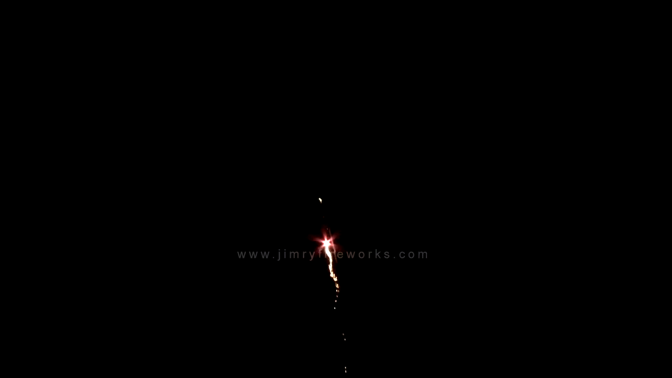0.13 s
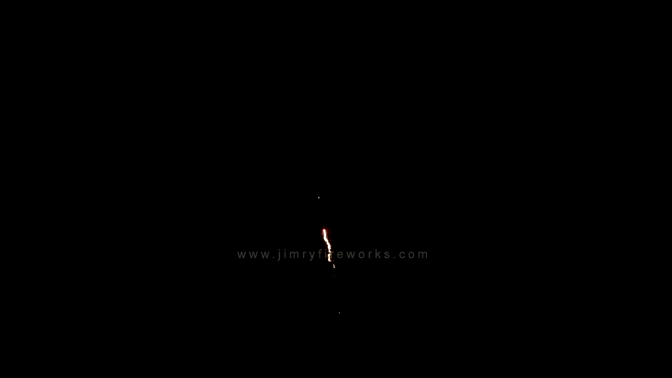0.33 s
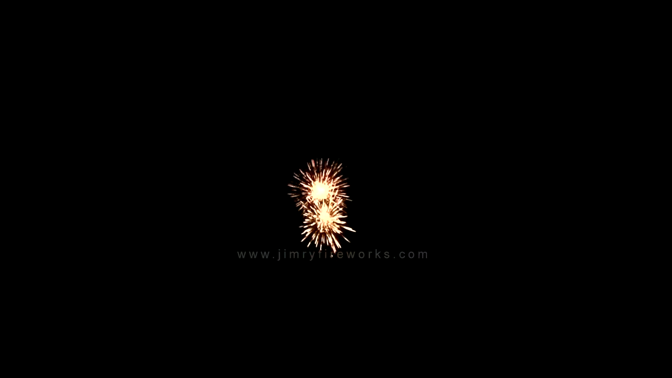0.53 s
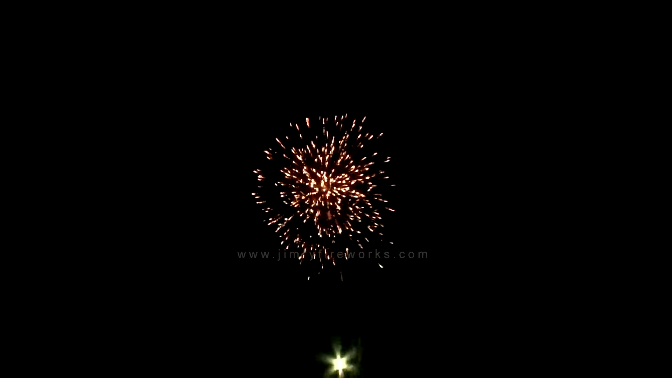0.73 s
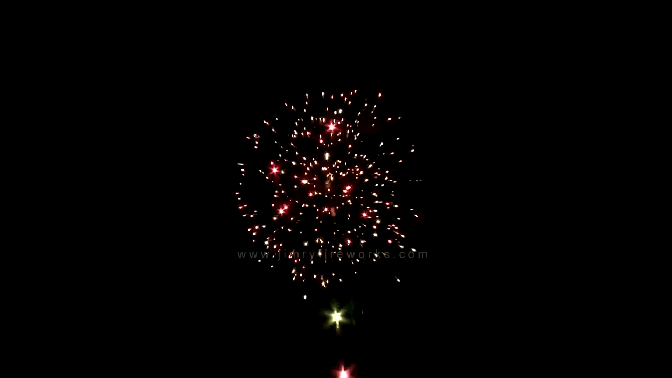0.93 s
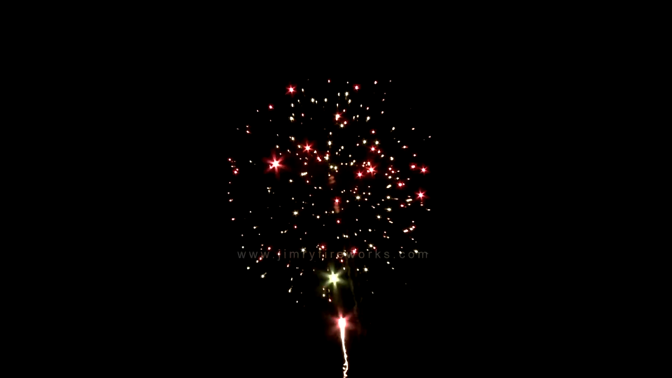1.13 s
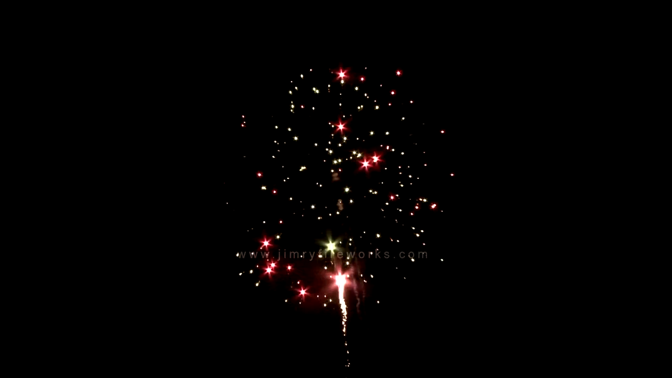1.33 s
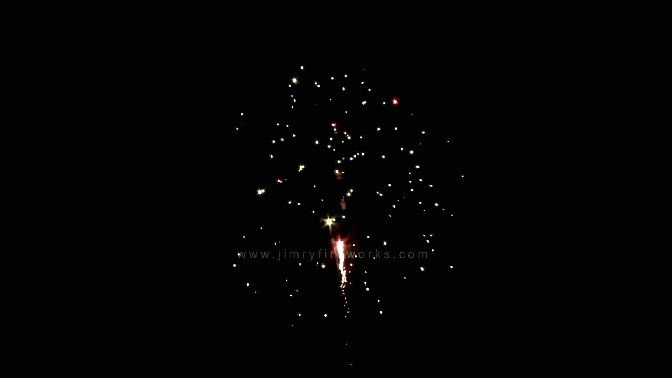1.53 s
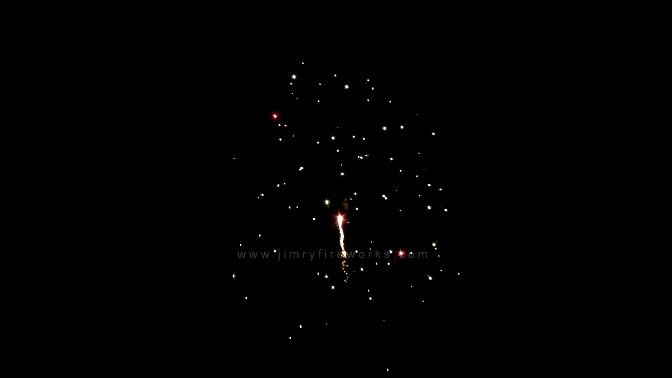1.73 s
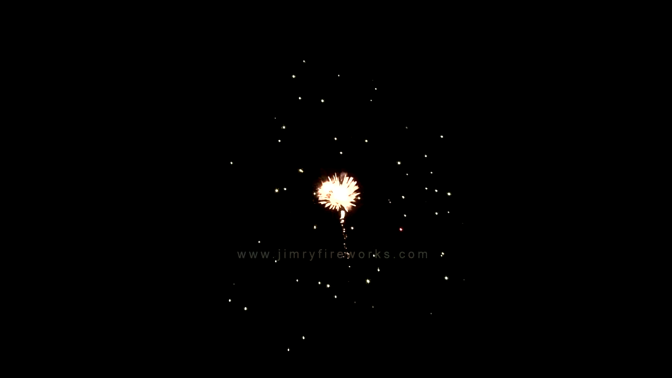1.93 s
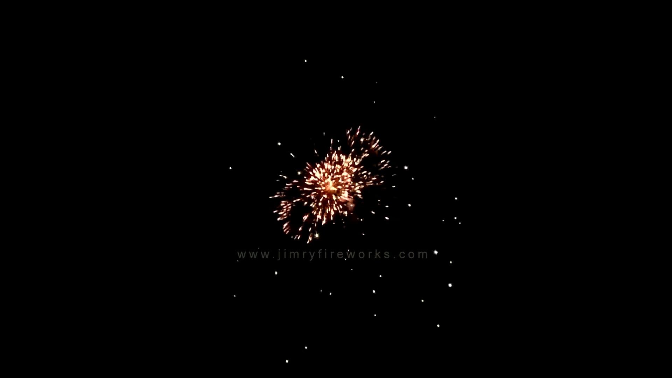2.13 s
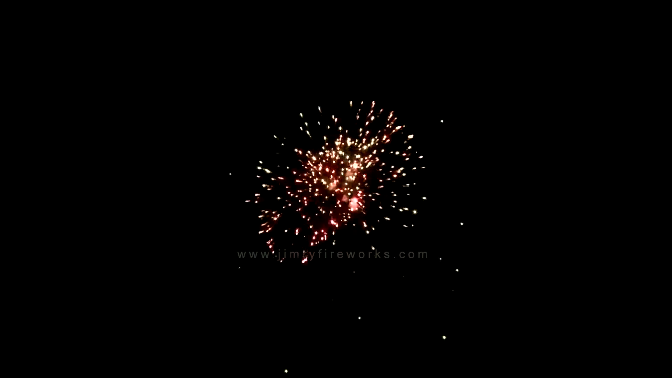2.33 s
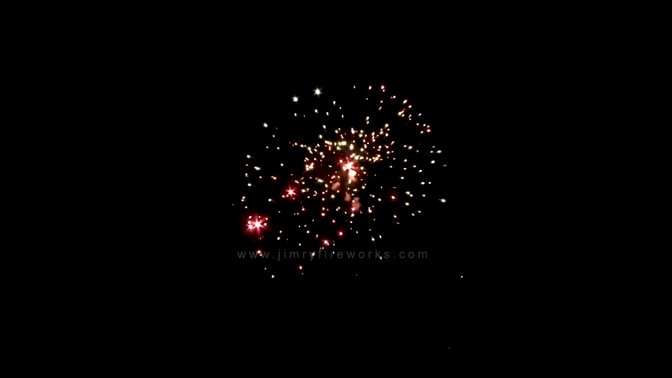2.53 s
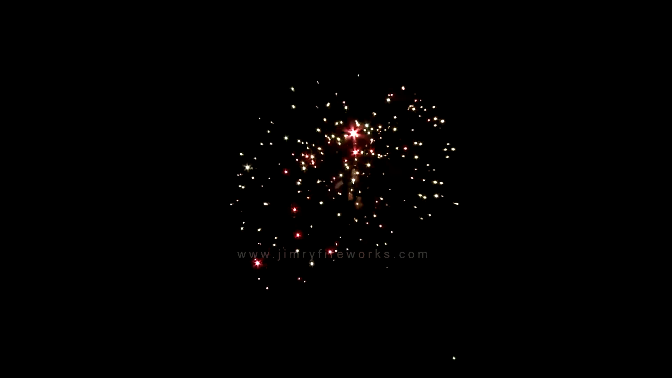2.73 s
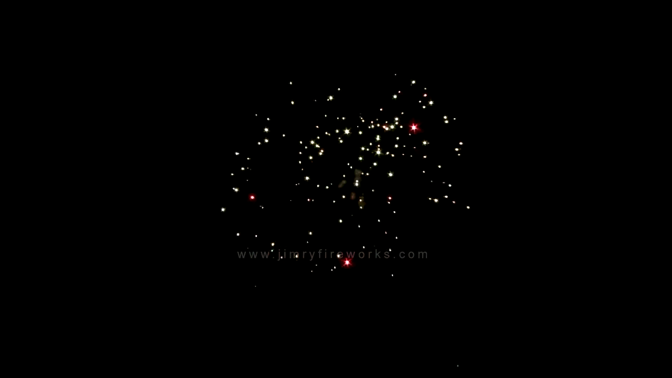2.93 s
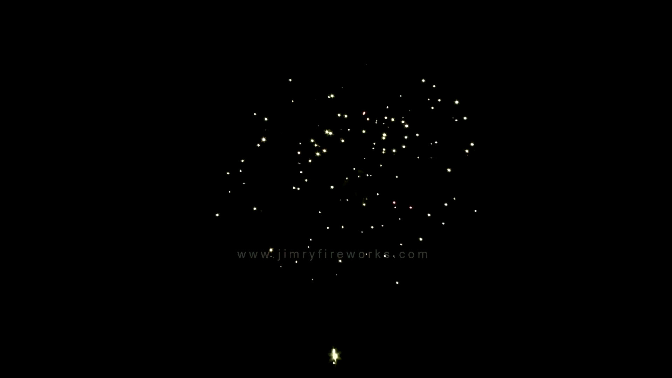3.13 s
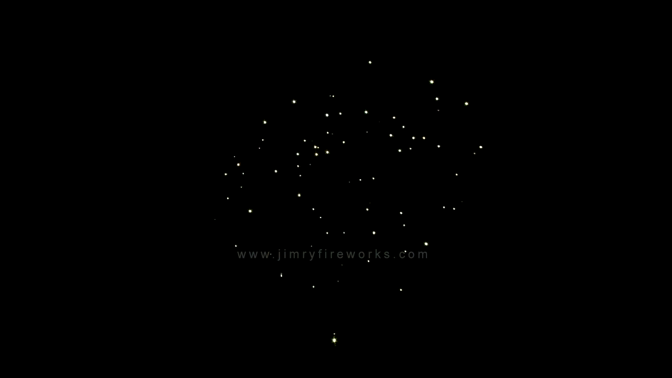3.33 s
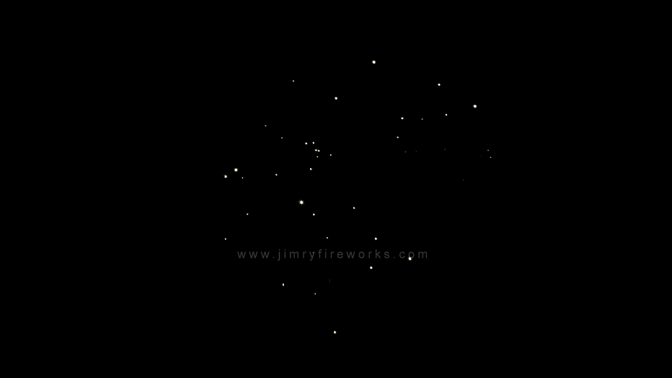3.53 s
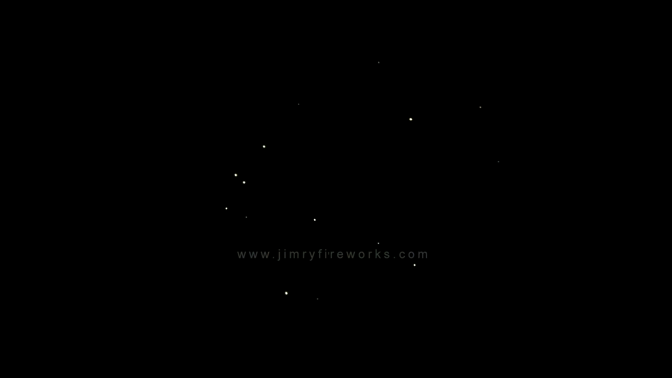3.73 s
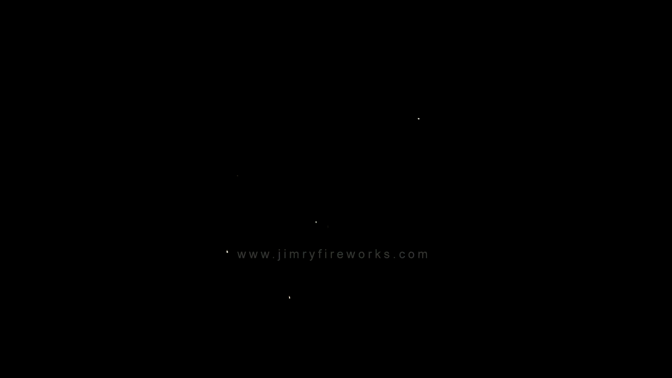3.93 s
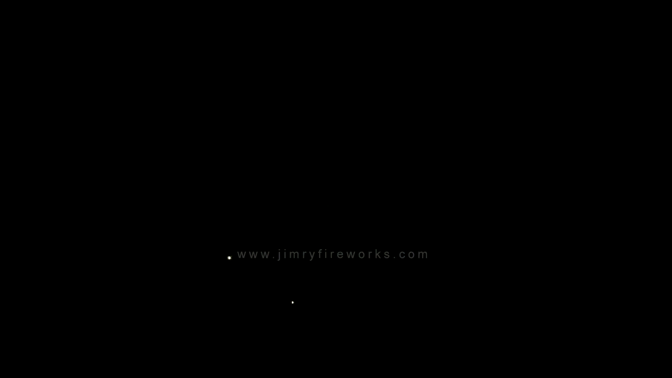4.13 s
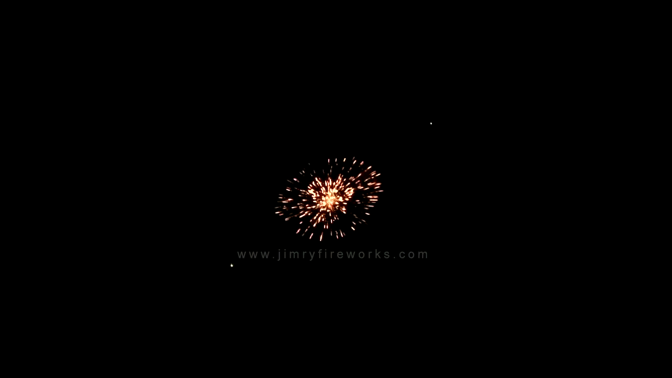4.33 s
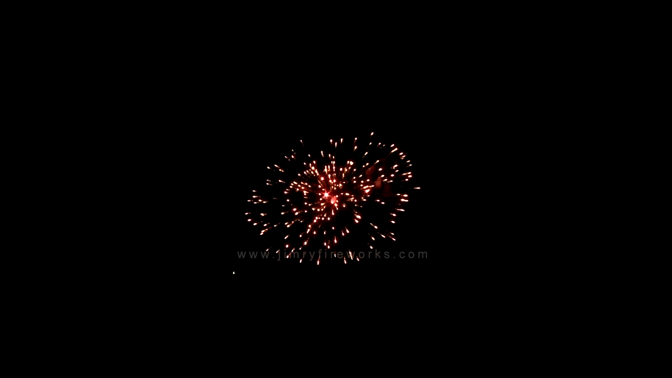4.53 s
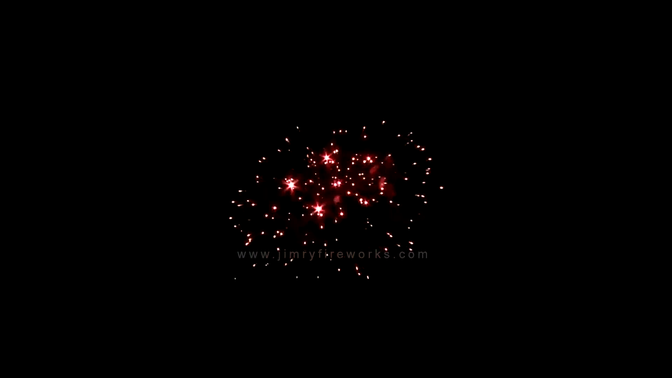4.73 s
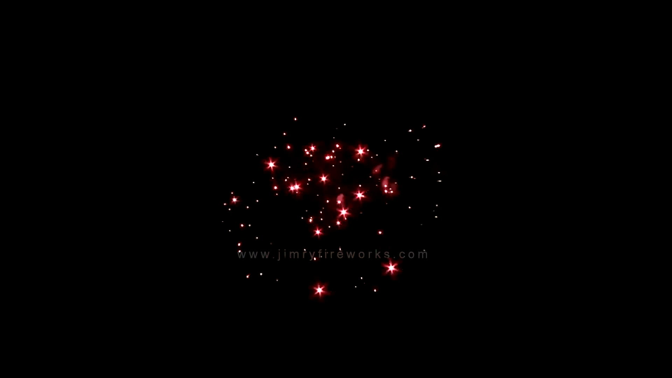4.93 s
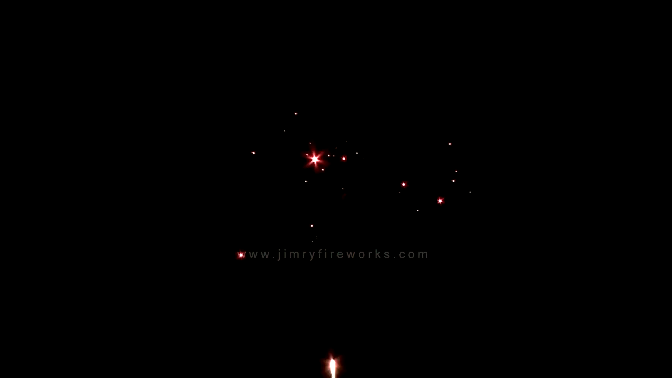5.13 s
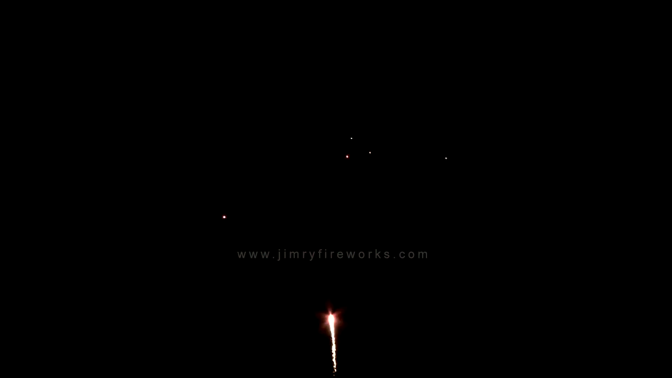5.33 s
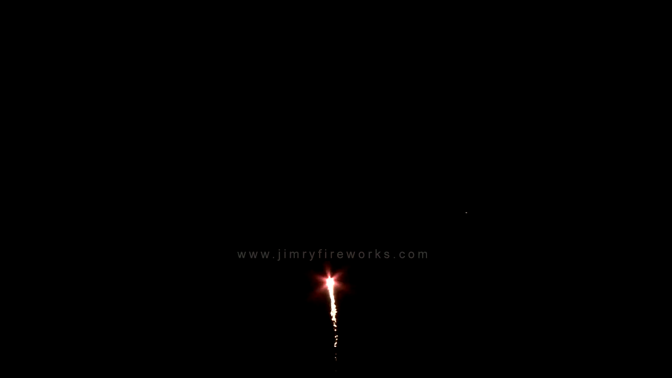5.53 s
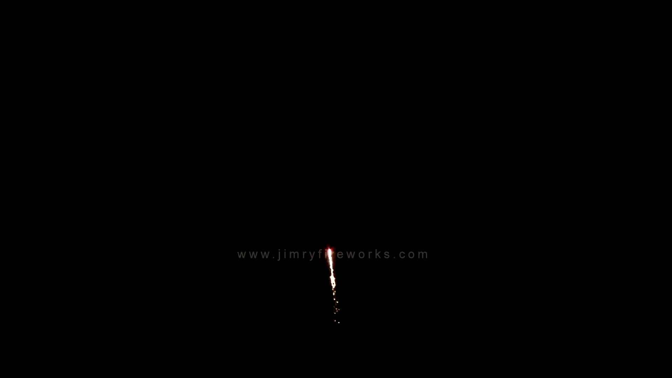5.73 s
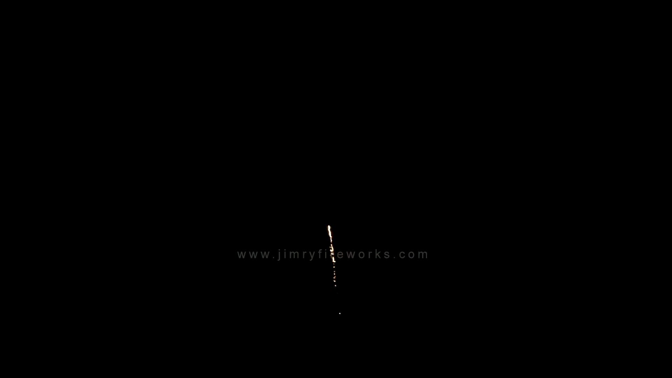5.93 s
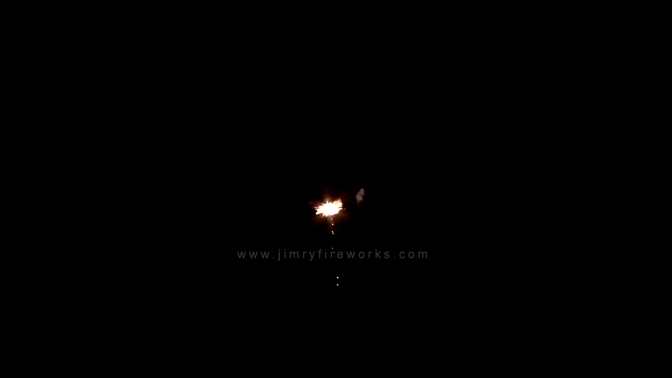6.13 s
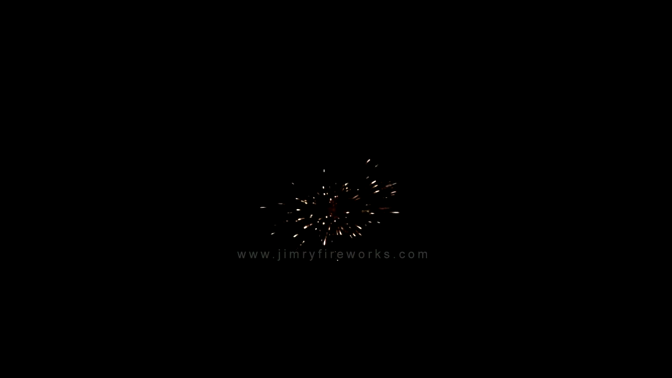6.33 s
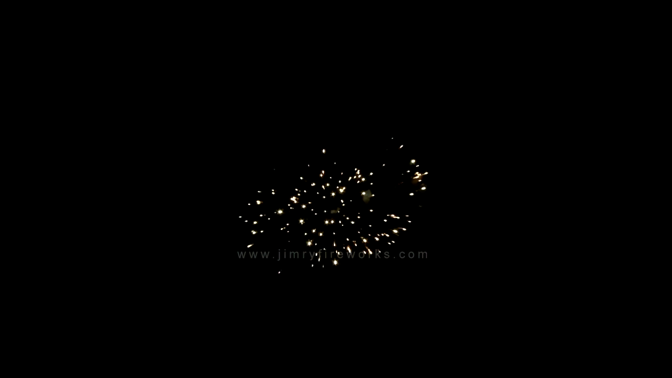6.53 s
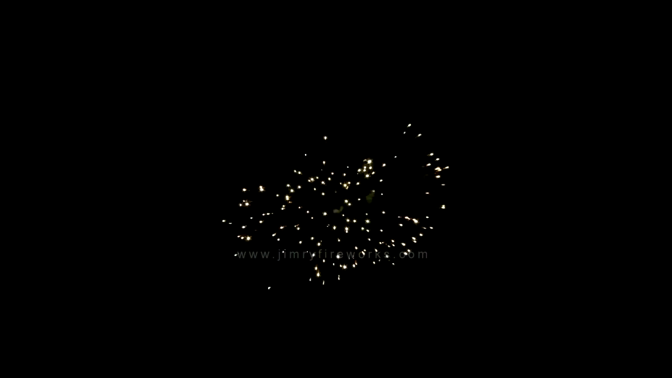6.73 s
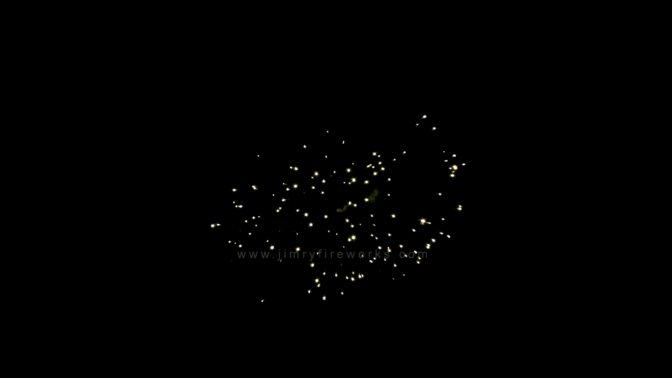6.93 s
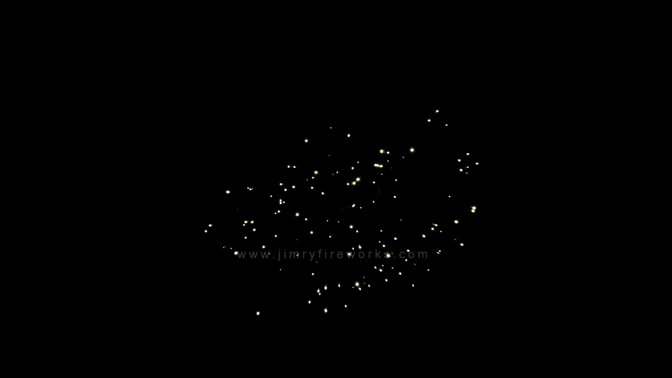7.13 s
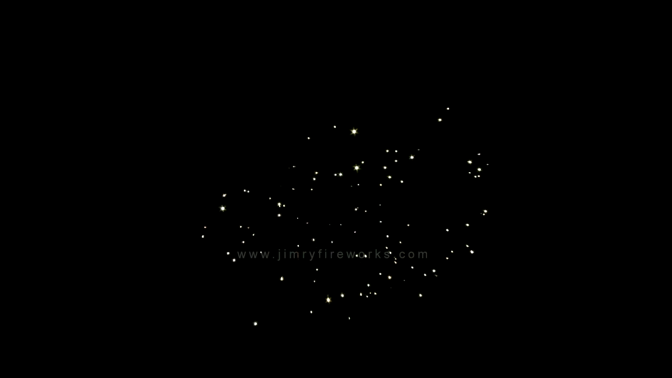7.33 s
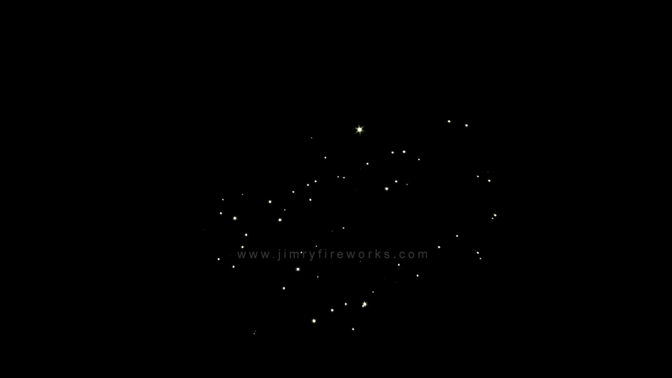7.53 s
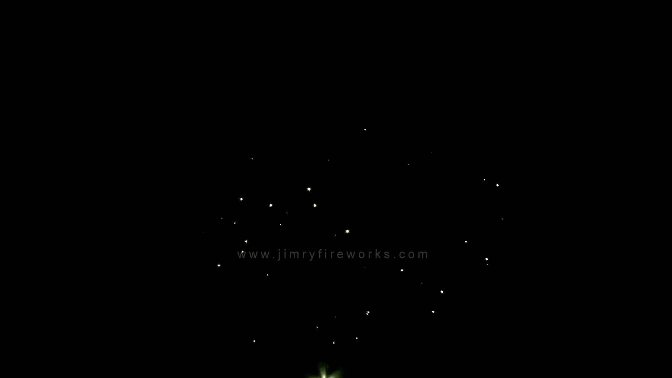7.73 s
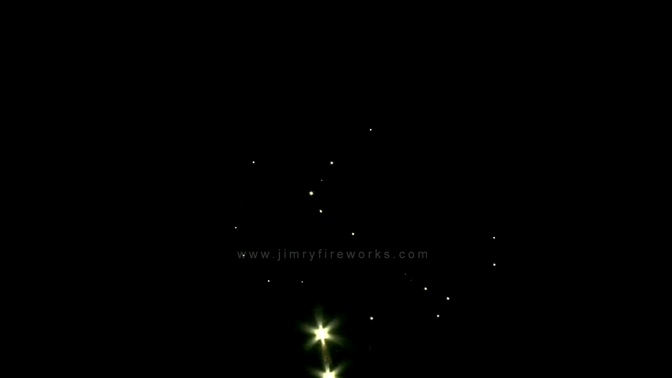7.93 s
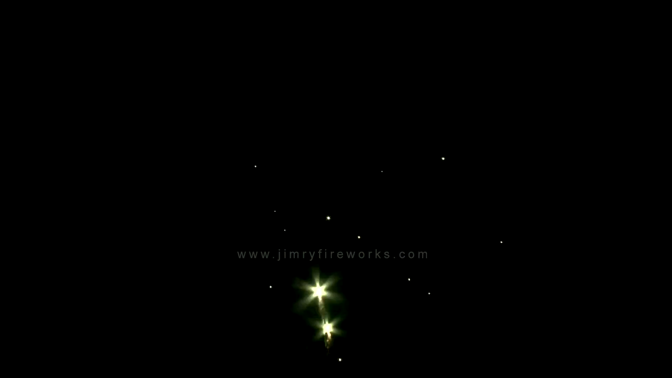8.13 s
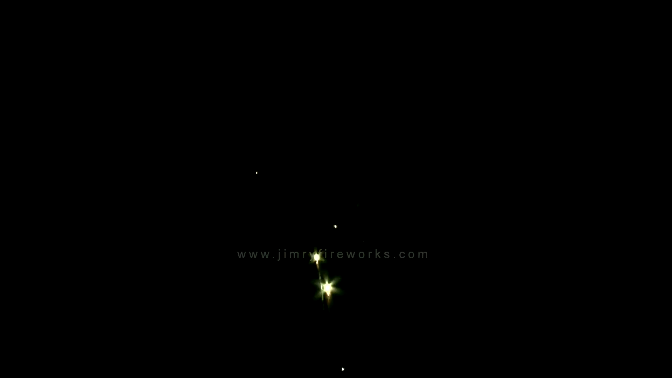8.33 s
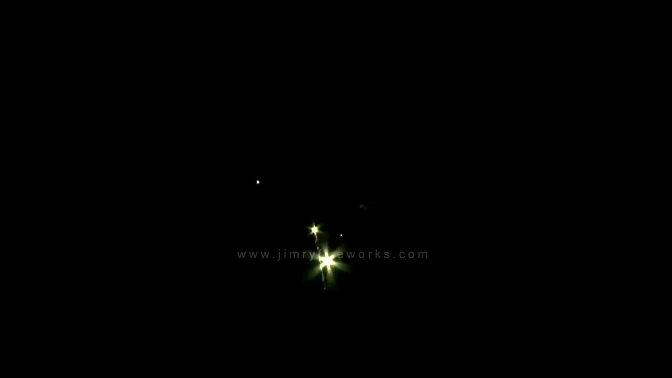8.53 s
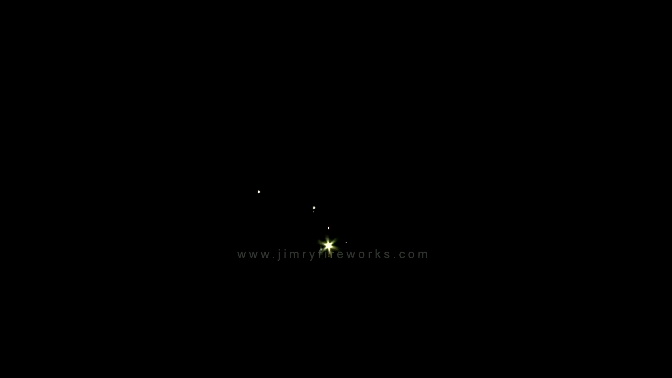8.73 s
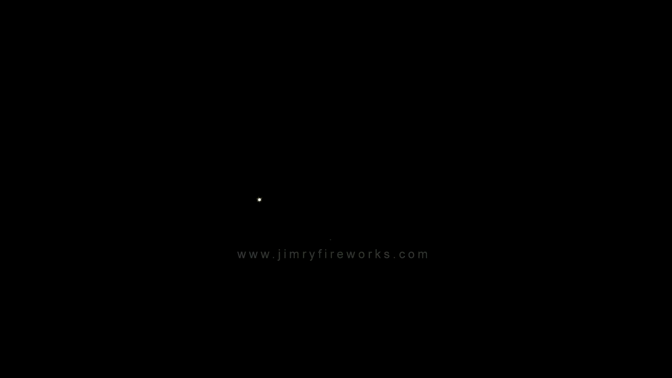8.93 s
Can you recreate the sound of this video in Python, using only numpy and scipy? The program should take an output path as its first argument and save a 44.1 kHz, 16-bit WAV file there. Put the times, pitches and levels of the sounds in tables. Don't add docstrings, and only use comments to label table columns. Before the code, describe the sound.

Clipped firework booms and dry launch cracks slap off nearby walls, then roll back duller from distant slopes, with faint hissing comets and an idling engine.

```python
import sys
import numpy as np
from scipy import signal
from scipy.fft import rfft, irfft, next_fast_len
from scipy.io import wavfile
from scipy.ndimage import uniform_filter1d, map_coordinates

SR = 44100
rng = np.random.default_rng(int(sys.argv[2]) if len(sys.argv) > 2 else 0)


def invert_db(level):
    return 10 ** (np.asarray(level, dtype=float) / 20)


def unload_audio(sound):
    columns = np.transpose(np.atleast_2d(sound))
    steps = np.round(np.clip(columns, -1, 1) * 32767)
    wavfile.write(sys.argv[1], SR, steps.astype(np.int16))


N = 395577

# freq_hz, density_db_per_hz
RUMBLE_SPECTRUM = [(10, -60), (27, -31), (40, -10), (65, 0), (95, -3), (140, -14), (250, -30), (1000, -120)]
AIR_SPECTRUM = [(60, -40), (100, -14), (200, -12), (400, 0), (850, -8), (1030, -7), (2300, -19),
                (4100, -24), (6150, -41), (9000, -70), (15500, -110)]
COMET_SPECTRUM = [(100, -90), (300, -30), (800, -5), (2500, 0), (4200, -5), (5500, -14), (7500, -21),
                  (11000, -50), (16000, -100)]
RUMBLE_DB, RUMBLE_FALL_DB_PER_S, MURMUR_DB = -36, 2.5, -43.5

# order, level_db
ENGINE_ORDERS = [(1, -43), (2, -39), (3, -25), (4, -11), (5, -6), (6, 0), (7, -3), (8, -2), (9, -17),
                 (10, -14), (11, -15), (12, -15)]
# time_s, level_db
ENGINE_LEVEL = [(0, -42), (3, -45), (4.4, -43.5), (5.5, -46.5), (6.4, -50), (7.4, -48), (8.3, -42),
                (8.97, -44)]
IDLE_HZ, REV_HZ_PER_S2 = 11.2, .012

# start_s, burn_s, level_db, release_db_per_s
COMETS = [
    (-.1, .2, -50, 40),
    (.218, .13, -41, 60),
    (6.05, .2, -59, 30),
    (8.2, .3, -61, 40),
    (8.545, .22, -49.5, 300),
]
CATCH_S = .008

# start_s, peak_db, pitch_hz, length_cycles
STRAY_THUMPS = [
    (.205, -27, 230, .8),
    (.222, -25, 75, 1.3),
    (.305, -25, 75, 1.2),
]
# delay_s, peak_db, pitch_hz, path_m_per_m_east, path_m_per_m_north
CLIFFS = [(.082, -9, 450, .6, -.37), (.375, -11.5, 650, .95, 0), (.397, -3.3, 420, .4, .15),
          (.398, -9, 1050, .4, .15), (.427, -11.5, 440, 0, 0), (.469, -14.5, 430, 0, 0),
          (1.015, -18, 390, 0, .95)]
# delay_s, peak_db, pitch_hz, length_cycles
HOUSE_FRONTS = [(.3308, -11, 1750, .75), (.4098, -11, 1150, .6), (.4545, -13, 1150, 1.5)]
# freq_hz, gain_db
FAR_AIR = [(20, 0), (2500, 0), (4500, -9), (7000, -35), (10000, -70), (16000, -100)]
CLIFF_CYCLES, SMEAR_CYCLES_PER_S, SOUND_M_PER_S = .55, .7, 343
SHADE_DB_PER_M = .5

# delay_s, spread_s, level_db, treble_over_bass_db
SKY_SLOPES = [(0, .035, -16, 3), (.25, .22, -23, -1.2), (.4, .065, -20.5, 2.2), (.56, .16, -28, 2.5),
              (.84, .25, -28, -2.2), (1.12, .3, -33, -1.2), (2.12, .3, -39, -6)]
TUBE_SLOPES = [(0, .015, -19, 2.2), (.085, .07, -24, -2.5), (.42, .12, -36, 2.2)]
# start_db, loss_db_per_s, treble_over_bass_db, length_s
SKY_FADE = (-25, 12.5, 1.2, 2.7)
TUBE_FADE = (-28, 14, -.7, 2.2)
# freq_hz, density_db_per_hz
SKY_COLOUR = [(24, -49), (40, -16), (127, -2), (190, -6.5), (433, -1), (751, -12), (1070, -12), (4340, -25),
              (8550, -42.5), (14100, -69), (16000, -107)]
TUBE_COLOUR = [(24, -32), (40, -2), (163, -12), (382, -3), (585, -9), (697, -12), (1180, -7), (3300, -15),
               (6650, -32), (14100, -70), (16000, -101)]
# freq_hz, loss_db_per_s
AIR_LOSS = [(500, 0.1), (2000, 3), (5000, 12), (8500, 31), (12000, 85), (16000, 170)]

# delay_s, peak_db, pitch_hz, length_cycles
SKY_WALLS = [(.0045, -9, 5500, 3), (.0165, 1, 5000, 1.5), (.0172, -5, 420, 1.3), (.0215, -8, 330, 1.5),
             (.0285, -11, 500, 1.5)]
# delay_s, peak_db, pitch_hz
TUBE_SLAPS = [(-.0042, -17, 900), (-.003, -13, 2400), (-.0014, -11, 3200), (.0001, -2, 4200),
              (.0183, -9, 1300), (.0186, -11, 4200), (.020, -2.2, 2000), (.0245, -10, 1500),
              (.055, -14, 1100), (.0715, -3.2, 1650), (.073, -13, 330), (.085, -13, 1050),
              (.116, -16, 1100)]
SLAP_CYCLES, SIDE_STEP, UNDER_DB, OVER_DB = 2.2, 2.3, -7, -12
RISE_S, DULL_S_PER_S = 4e-5, .7e-3

# gain, positive_phase_s, decay, ring_hz, ring_q, low_ring_hz, low_ring_q,
# bounce_delay_s, bounce_share, bounce_top_hz
SKY_BLAST = (7.0, .004, .3, 325, 1.3, 127, 1.87, .0043, .825, 306)
TUBE_BLAST = (3.4, .004, .3, 357, .63, 58, 3.0, .0039, -.555, 312)
# start_s, blast_db, echo_db
LIFTS = [
    (-.75, 0, 5),
    (.5605, .6, 2.2),
    (.858, 0, -5.5),
    (2.8816, -1.5, -3),
    (4.987, -.4, -1.5),
    (7.6479, 1.2, -.3),
    (7.8288, 1.6, .2),
]
# start_s, blast_db, echo_db, drift_east_m, drift_north_m
BURSTS = [
    (-1.75, 0, 0, 0, 0),
    (.8927, 0, -1.7, 0, -1),
    (.9103, -1, -3.5, 1, -2.7),
    (2.2994, 0, -1, .4, 0),
    (2.3385, 0, -2, .2, -1),
    (4.5812, 0, 0, 2, 5),
    (6.5306, 0, 0, -3, 2.4),
]

# freq_hz, gain_db
INPUT_FILTER = [(20, 0), (14000, 0), (16500, -14), (20000, -30)]
# freq_hz, density_db_per_hz
SELF_NOISE = [(1000, -20), (6000, 3), (9000, 0), (14300, -1), (15300, -50)]
# pitch_hz, rms_db
WHINE = [(8549, -91), (8699, -94), (9001, -90), (9152, -94), (10950, -93), (11698, -96), (11849, -96),
         (12452, -96)]
# freq_hz, side_minus_mid_db
CHANNEL_DIFFERENCE = [(30, -34), (500, -32), (2000, -33), (8000, -30), (14000, -24)]


def unit(x):
    return x / np.sqrt(np.mean(x ** 2) + 1e-20)


def along(points, hz):
    f, v = np.transpose(points)
    return np.interp(np.log(hz + 1), np.log(f + 1), v)


def wobble(rate_hz):
    knots = rng.standard_normal(int(N * rate_hz / SR) + 4)
    return map_coordinates(knots, [np.arange(N) * rate_hz / SR])


def coloured(x, points):
    m = next_fast_len(N + 8192)
    gain = invert_db(along(points, np.fft.rfftfreq(m, 1 / SR)))
    return irfft(rfft(x, m) * gain, m)[:N]


def add(track, start_s, sound):
    at = round(start_s * SR)
    part = sound[max(-at, 0):max(N - at, 0)]
    track[max(at, 0):][:len(part)] += part


def night_air():
    return invert_db(MURMUR_DB + 1.1 * wobble(1.5)) * unit(coloured(rng.standard_normal(N), AIR_SPECTRUM))


def low_rumble():
    t = np.arange(N) / SR
    level_db = RUMBLE_DB - RUMBLE_FALL_DB_PER_S * t + 1.5 * wobble(6)
    return invert_db(level_db) * unit(coloured(rng.standard_normal(N), RUMBLE_SPECTRUM))


def engine():
    t = np.arange(N) / SR
    turns = IDLE_HZ * t + REV_HZ_PER_S2 * t ** 3 / 3 + .04 * wobble(1.5)
    sway = invert_db(np.interp(t, *np.transpose(ENGINE_LEVEL)) + 1.2 * wobble(3))
    orders = sum(invert_db(db) * np.sin(2 * np.pi * (k * turns + rng.random())) for k, db in ENGINE_ORDERS)
    return sway * orders


def comets():
    t, burn = np.arange(N) / SR, np.zeros(N)
    for start_s, burn_s, level_db, release in COMETS:
        catch = np.clip((t - start_s) / CATCH_S, 0, 1)
        burn += catch * invert_db(level_db - release * np.maximum(t - start_s - burn_s, 0))
    return burn * invert_db(1.5 * wobble(30)) * unit(coloured(rng.standard_normal(N), COMET_SPECTRUM))


def ragged(slap, share, smear_s):
    t = np.arange(512) / SR
    trail = rng.standard_normal(len(t)) * np.exp(-t / smear_s)
    return slap + share * np.convolve(slap, trail / np.linalg.norm(trail))[:len(slap)]


def far_slap(peak_db, hz, cycles):
    turns = np.arange(0, 7 * cycles, hz / SR)
    swell = (turns / cycles * np.exp(1 - turns / cycles)) ** 1.7
    grit = uniform_filter1d(rng.standard_normal(len(turns)), size=7)
    return invert_db(peak_db) * ragged(swell * (np.sin(2 * np.pi * turns) + .35 * grit), .3, .004)


def far_walls():
    out = np.zeros(N)
    for start_s, *shape in STRAY_THUMPS:
        add(out, start_s, far_slap(*shape))
    for start_s, blast_db, _, east_m, north_m in BURSTS:
        for delay_s, db, hz, per_east, per_north in CLIFFS:
            late_s = (per_east * east_m + per_north * north_m) / SOUND_M_PER_S
            peak_db = db + blast_db - SHADE_DB_PER_M * north_m + .6 * rng.standard_normal()
            cycles = CLIFF_CYCLES + SMEAR_CYCLES_PER_S * delay_s
            add(out, start_s + delay_s + late_s, far_slap(peak_db, hz, cycles))
    for start_s, blast_db, echo_db in LIFTS:
        for delay_s, db, hz, cycles in HOUSE_FRONTS:
            peak_db = db + blast_db + .6 * echo_db + .5 * rng.standard_normal()
            add(out, start_s + delay_s, far_slap(peak_db, hz, cycles))
    return coloured(out, FAR_AIR)


def roll(slopes, fade, colour, lumpy_db):
    start_db, loss_db_per_s, tilt_db, length_s = fade
    size = round(length_s * SR)
    even, lumps = rng.standard_normal((2, 3 * SR))[:, :size]
    lumps = invert_db(lumpy_db * unit(uniform_filter1d(lumps, size=130)))
    uneven_bass = uniform_filter1d(unit(even * lumps) - even, size=9)
    hz, t, z = signal.stft(even + uneven_bass, SR, nperseg=512)
    ends = np.array([[0], [1]])
    power = invert_db(2 * (start_db - loss_db_per_s * t + tilt_db * ends))
    for delay_s, spread_s, db, treble_db in slopes:
        power = power + invert_db(2 * (db + treble_db * ends - 10 * ((t - delay_s) / spread_s) ** 2))
    low_db, high_db = 10 * np.log10(power)
    treble = np.clip(np.log(hz / 550 + 1e-9) / np.log(3.5), 0, 1)[:, None]
    air_db = along(AIR_LOSS, hz)[:, None] * (t - .15)
    gain_db = low_db + treble * (high_db - low_db) - air_db
    gain = unit(invert_db(along(colour, hz)))[:, None] * invert_db(gain_db)
    echoes = signal.istft(z * gain, SR, nperseg=512)[1][:size]
    return signal.sosfilt(signal.butter(2, 55, "high", fs=SR, output="sos"), echoes)


def tube_walls():
    steps = ((1, 0), (1 / SIDE_STEP, UNDER_DB), (SIDE_STEP, OVER_DB))
    return [(delay_s, db + step_db, hz * step, SLAP_CYCLES)
            for delay_s, db, hz in TUBE_SLAPS for step, step_db in steps]


def near_slap(delay_s, hz, cycles):
    t = np.arange(1024) / SR
    front = 1 - np.exp(-t / (RISE_S + DULL_S_PER_S * abs(delay_s)))
    return ragged(np.sin(2 * np.pi * hz * t) * np.exp(-1.5 * t * hz / cycles) * front, .35, .003)


def blast(gain, phase_s, decay, hz, q, low_hz, low_q, bounce_s, share, top_hz):
    u = np.arange(4096) / SR / phase_s
    s = 1j * np.fft.rfftfreq(4096, 1 / SR)
    jump = (1 - u) * np.exp(-decay * u)
    cut = s ** 4 / (s * s + s * hz / q + hz * hz) / (s * s + s * low_hz / low_q + low_hz ** 2)
    ground = 1 + share * np.exp(-2 * np.pi * s * bounce_s) / (1 + s / top_hz)
    return gain * irfft(rfft(jump) * cut * ground)[:2048]


def volley(shots, shape, walls, slopes, fade, colour, scatter, lumpy_db):
    out, wave = np.zeros(N), blast(*shape)
    for start_s, blast_db, echo_db, *_ in shots:
        add(out, start_s, invert_db(blast_db) * wave)
        add(out, start_s + .002, invert_db(echo_db) * roll(slopes, fade, colour, lumpy_db))
        for delay_s, db, hz, cycles in walls:
            late, loud, tone = rng.standard_normal(3)
            slap = near_slap(delay_s, hz * (1 + .07 * tone), cycles)
            add(out, start_s + delay_s * (1 + scatter * late), invert_db(blast_db + db + .9 * loud + 2.5) * slap)
    return out


def lift_charges():
    return volley(LIFTS, TUBE_BLAST, tube_walls(), TUBE_SLOPES, TUBE_FADE, TUBE_COLOUR, .002, lumpy_db=1.8)


def shell_bursts():
    return volley(BURSTS, SKY_BLAST, SKY_WALLS, SKY_SLOPES, SKY_FADE, SKY_COLOUR, .012, lumpy_db=2.2)


def scene():
    background = night_air() + low_rumble() + engine() + comets()
    mid = background + far_walls() + lift_charges() + shell_bursts()
    return np.array([mid, mid])


def low_pass(x):
    return signal.sosfilt(signal.butter(12, 16830, fs=SR, output="sos"), x)


def record(dry):
    t = np.arange(N) / SR
    flat = coloured(np.clip(dry[0], -1.03, 1.03), INPUT_FILTER)
    flat = flat + invert_db(-77.5) * unit(coloured(rng.standard_normal(N), SELF_NOISE))
    flat = flat + sum(invert_db(db + 3) * np.sin(2 * np.pi * hz * t) for hz, db in WHINE)
    side = coloured(flat * wobble(60), CHANNEL_DIFFERENCE) * invert_db(-2.2)
    side = side + invert_db(-103) * rng.standard_normal(N)
    return low_pass(np.clip([flat + side, flat - side], -1, 1))


dry = scene()
out = record(dry)
unload_audio(out)
```